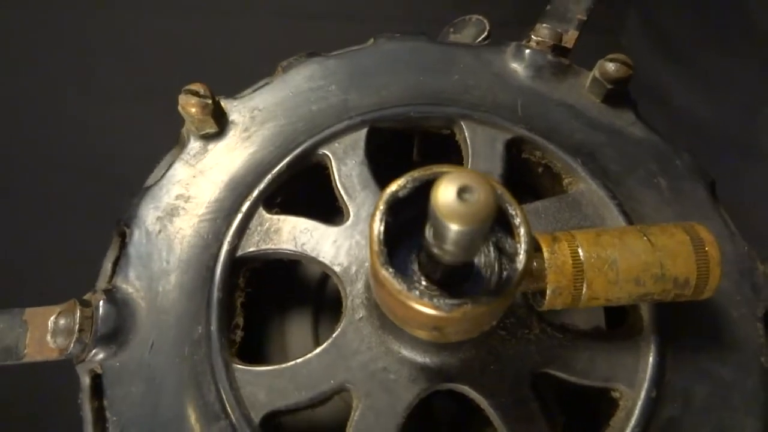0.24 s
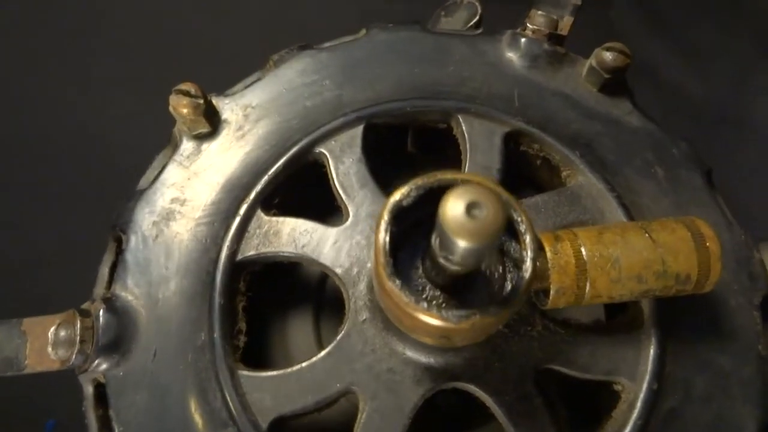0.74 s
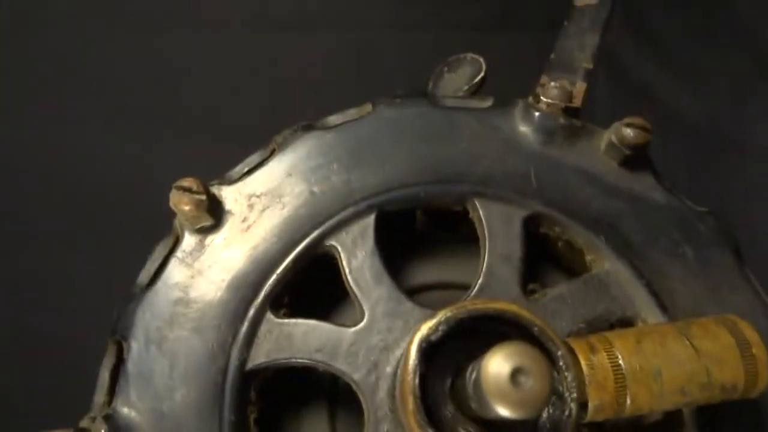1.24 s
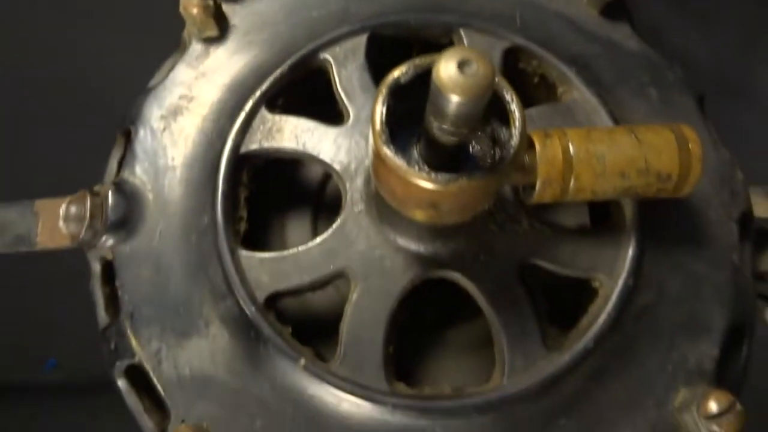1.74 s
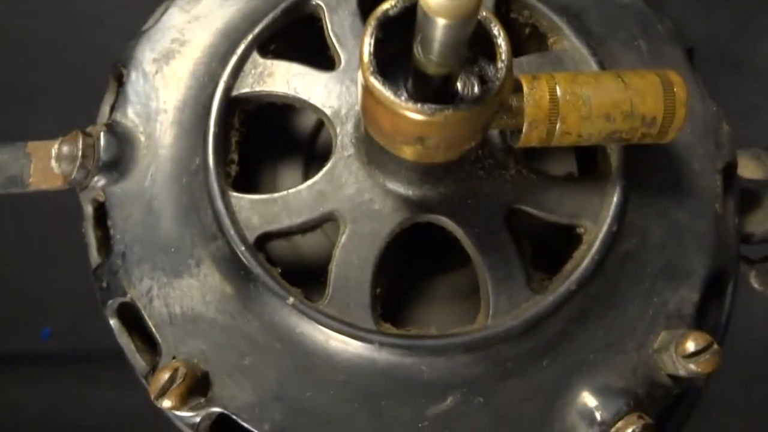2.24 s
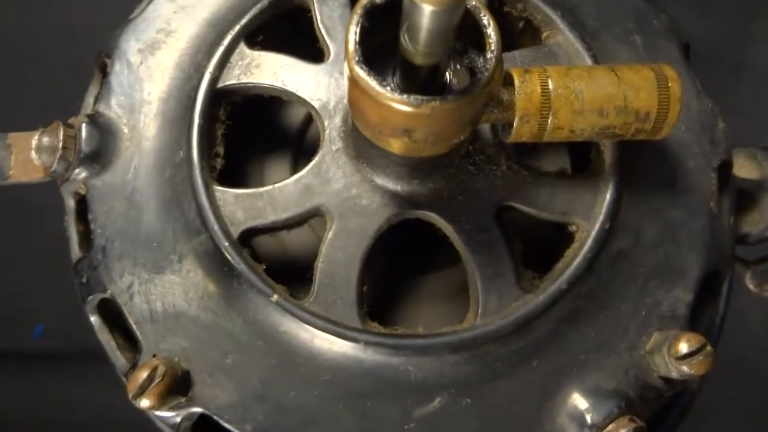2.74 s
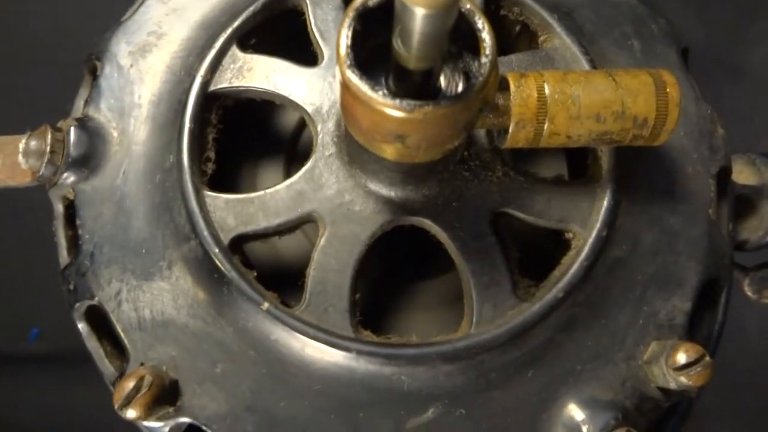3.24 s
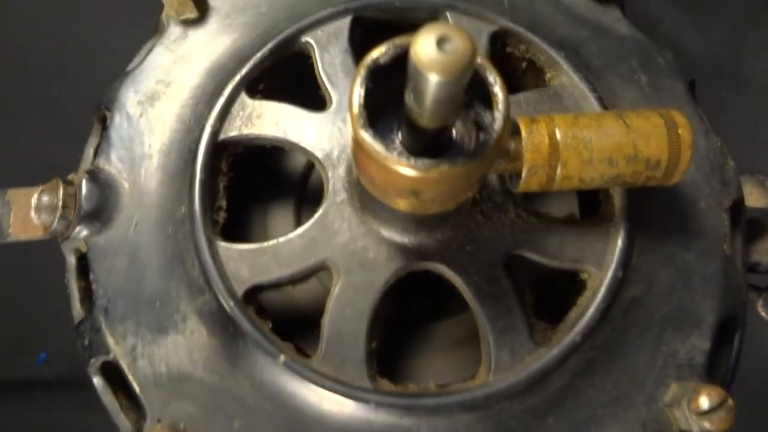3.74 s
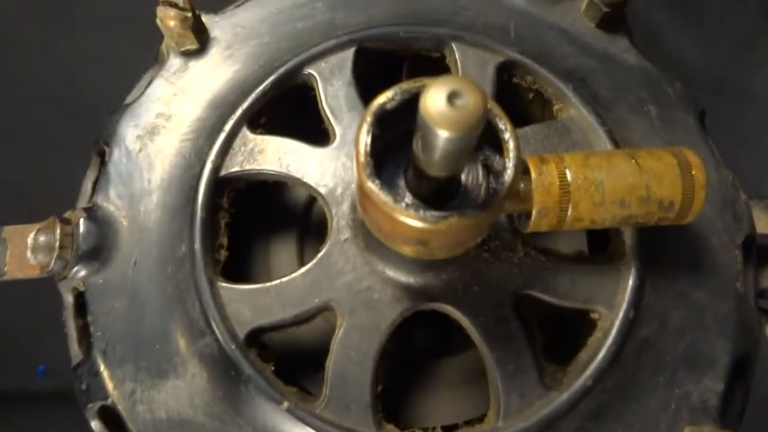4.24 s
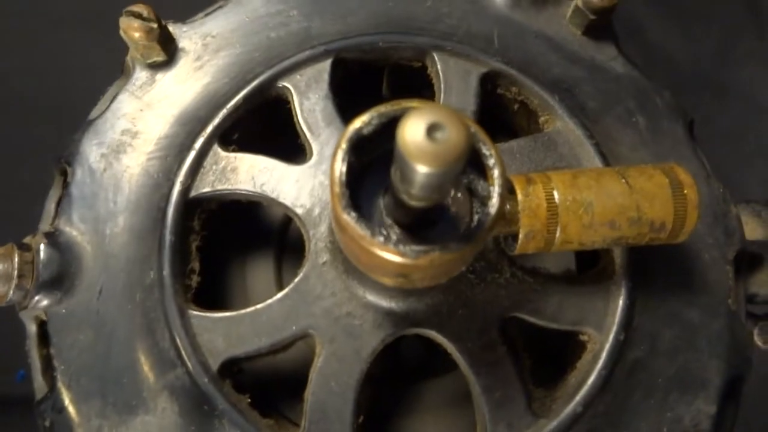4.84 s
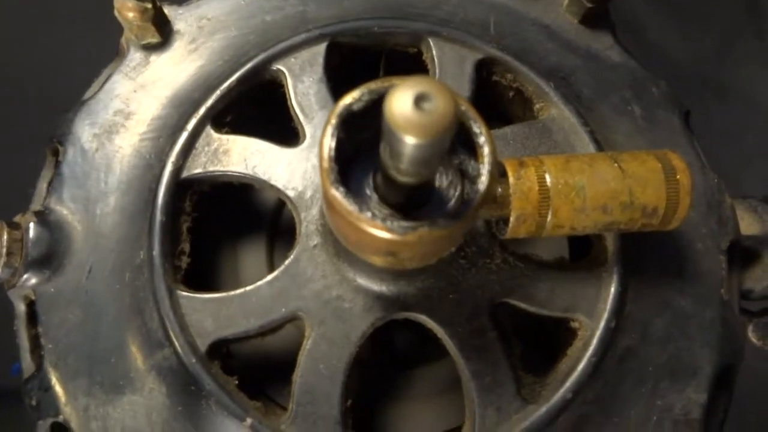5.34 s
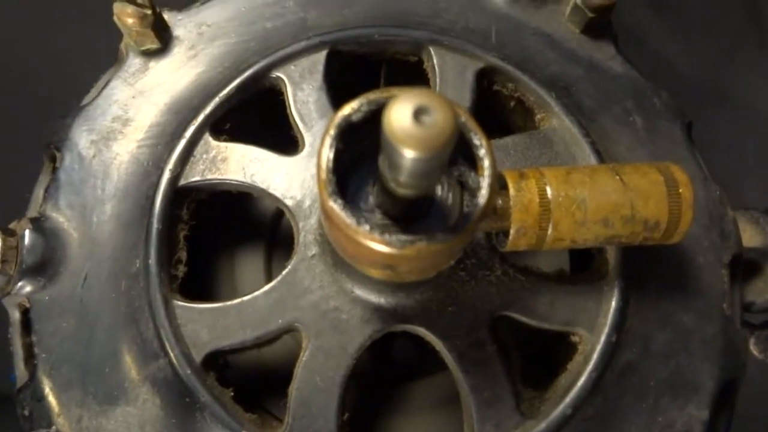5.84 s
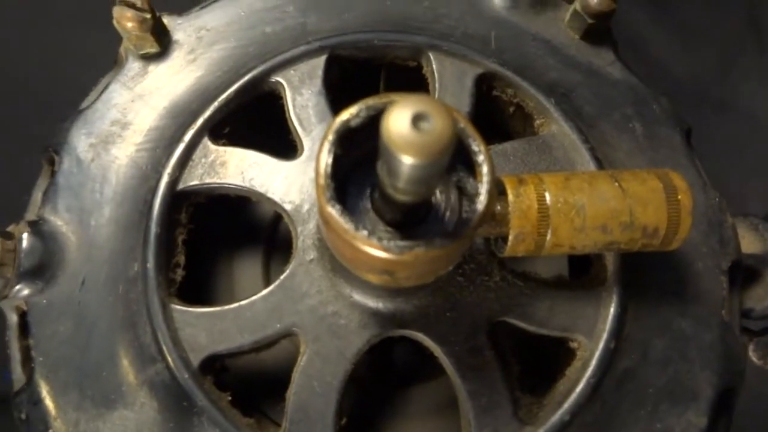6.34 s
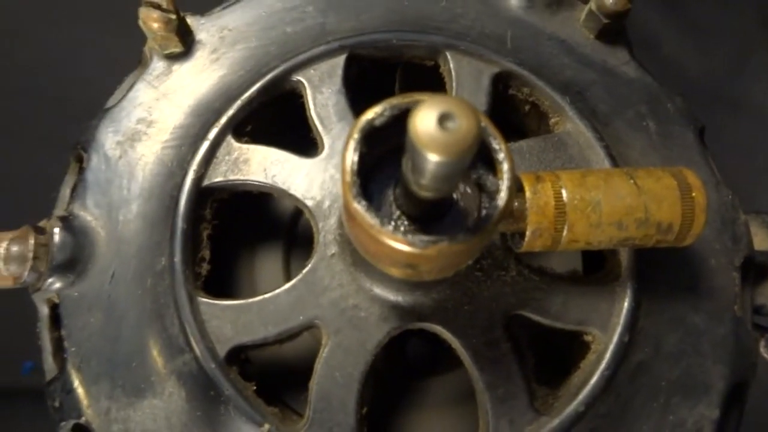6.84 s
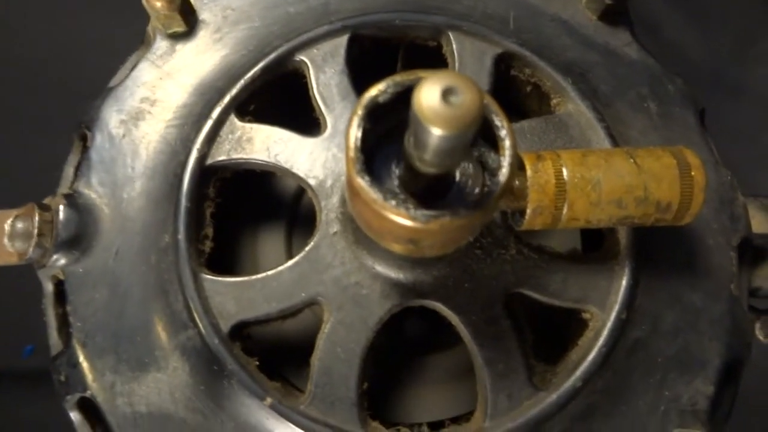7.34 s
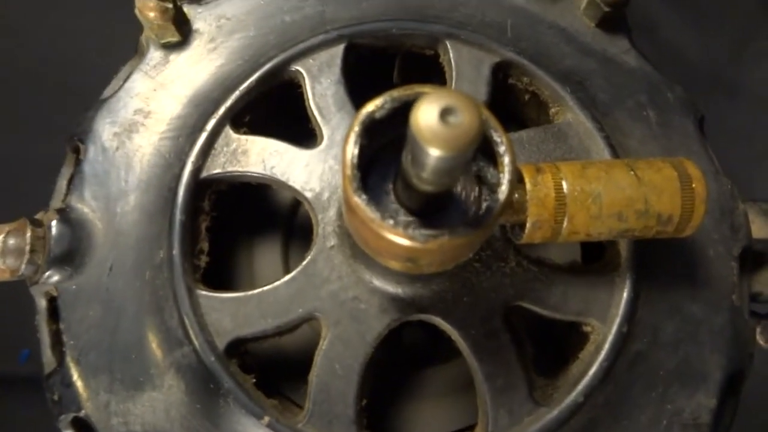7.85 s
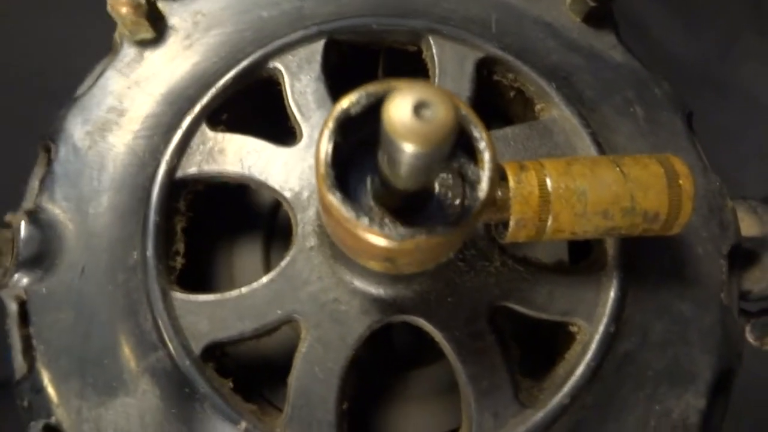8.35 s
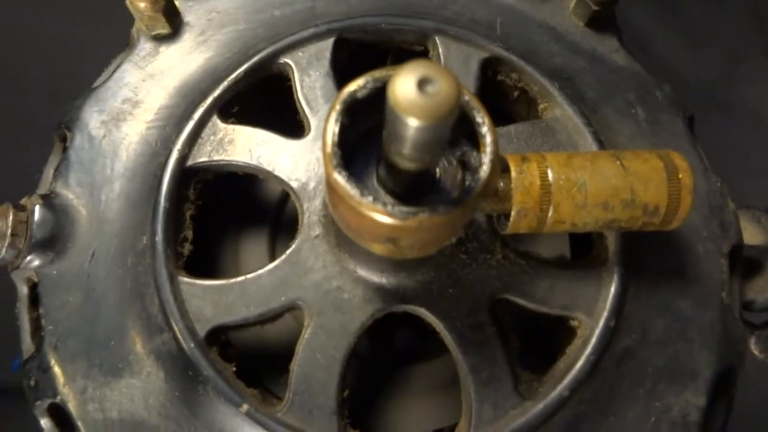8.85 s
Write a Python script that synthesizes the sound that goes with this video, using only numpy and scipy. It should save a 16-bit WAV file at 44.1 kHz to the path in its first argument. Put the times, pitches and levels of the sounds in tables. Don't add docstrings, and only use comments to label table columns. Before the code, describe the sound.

Steady low mains hum and thin whine from a bare fan motor, brief shoe scuff, dry ticks, loud switch clack, then a fluttering, rumbling slowdown.

```python
import sys
import numpy as np
from scipy import signal
from scipy.fft import rfft, irfft, next_fast_len
from scipy.io import wavfile
from scipy.ndimage import uniform_filter1d

SR = 44100
rng = np.random.default_rng(int(sys.argv[2]) if len(sys.argv) > 2 else 0)


def inscribe(sig):
    pcm = np.round(np.clip(np.atleast_2d(sig).T, -1, 1) * 32767)
    wavfile.write(sys.argv[1], SR, pcm.astype(np.int16))


def voltage_ratio(decibels):
    exponent = np.asarray(decibels, float) / 20
    return 10 ** exponent


N = 401745
T = np.arange(N) / SR
OFF_S, DRAG_PER_S = 7.975, .203
MAINS_HZ, SHAFT_HZ, WARMING_HZ_PER_S = 59.98, 27.859, .004
BARS = 37
# pitch_hz, level_db (per Hz)
LAMINATION_COLOUR = [(40, -3), (100, 2.5), (250, -2), (450, -1.5), (680, -11.5), (800, -7), (1000, -10),
                     (1500, -23.5), (2100, -20), (2700, -27), (3200, -19), (4100, -28.5), (4500, -48),
                     (9000, -54)]


def level(x, db):
    return x * voltage_ratio(db) / np.sqrt(np.mean(x ** 2))


def walk(rate):
    points = rng.standard_normal(int(N / SR * rate) + 2)
    k = (T * rate).astype(int)
    blend = .5 - .5 * np.cos(np.pi * (T * rate - k))
    return 0.81 * (points[k] + blend * (points[k + 1] - points[k]))


def noise(colour, side_db):
    hz, db = np.transpose(colour)
    n = next_fast_len(N)
    bin_hz = np.arange(n // 2 + 1) * SR / n
    gain = voltage_ratio(np.interp(np.log(bin_hz + 1), np.log(hz), db, left=-60, right=-90))
    mid, side = (level(irfft(rfft(rng.standard_normal(n)) * gain, n)[:N], 0) for _ in range(2))
    return mid + voltage_ratio(side_db) * side * np.array([[1], [-1]])


def ring(x, hz, t60):
    pole = np.exp(2j * np.pi * min(hz, .45 * SR) / SR - np.log(1000) / (t60 * SR))
    return signal.lfilter([1], [1, -pole], x, axis=-1).imag


def hits(times, db):
    x = np.zeros(N)
    np.add.at(x, (np.atleast_1d(times) * SR).astype(int), voltage_ratio(db))
    return x


def tone(phase, hz, db, flutter_db):
    # pitch_hz, difference_db, phase_rad
    ports = [(130, -26.5, 1.7), (268, -7, 2.1), (500, -9.5, 1.93), (1100, -15.5, 3), (2010, -12, 1.2),
             (4020, -46, 6.6)]
    at, side_db, lag = np.transpose(ports)
    side = voltage_ratio(np.interp(hz, at, side_db)) * np.exp(1j * np.interp(hz, at, lag))
    start = 2 * np.pi * rng.random()
    z = np.sqrt(2) * voltage_ratio(db + flutter_db * walk(5.5)) * np.exp(1j * (phase + start))
    return np.array([(z * (1 + side)).imag, (z * (1 - side)).imag])


def resonate(x, modes):
    out = 0
    for k, (hz, width, db) in enumerate(modes):
        t60 = np.log(1000) / (np.pi * width)
        out = out + (-1) ** k * voltage_ratio(db) * width * ring(x, hz, t60)
    return level(out, 0)


def coasting(held_db, freed_db, fade_db_per_s):
    freed_s = 0.063
    after = np.maximum(T - OFF_S, 0)
    return held_db + (freed_db - held_db) * np.minimum(after / freed_s, 1) - fade_db_per_s * after


def magnetism(mains, shaft, power):
    # time_s, height (0 aside of the motor, 1 above it)
    hand = [
        (.5, 0.027),
        (1.2, 0.84),
        (1.7, 0),
        (2.5, 0),
        (3.9, 0),
        (4.3, 0.41),
        (4.8, 0.89),
        (8, 0.91),
    ]
    # mains_multiple, shaft_multiple, aside_db, above_db
    hum = [(2, -1, -37, -37), (2, 0, -23, -23), (2, 1, -48, -47), (2, 2, -47, -47), (2, 3, -57, -55),
           (4, -1, -62, -58), (4, 0, -50, -51), (4, 1, -46, -46), (4, 2, -60, -61)]
    # mains_multiple, bar_pass_multiple, aside_db, above_db, throb_depth (once a turn)
    whine = [(-2, 1, -58, -58, 0), (0, 1, -67, -56, 1), (2, 1, -44, -44, .11), (4, 1, -65, -67, 0),
             (0, 2, -47, -54, .27), (2, 2, -61, -64, 0), (-2, 3, -61, -62, .3), (0, 3, -63, -64, 1.2),
             (2, 3, -62, -70, .4), (4, 3, -75, -71, 0), (6, 3, -68, -66, .4), (-2, 4, -69, -65, .7),
             (0, 4, -67, -65, .8)]
    wobble_orders = (1, 2, 3, 4, 5, 7, 9, 11, 12, 15, 18, 19)
    wobble_db = (-62.5, -56, -48.5, -41.5, -50.5, -58.5, -67, -54, -69, -54, -62, -52.5)

    above = np.clip(np.interp(T, *np.transpose(hand)), -.5, 1.5)
    lines = [(*row, 0) for row in hum]
    lines += [(a, k * BARS, *rest) for a, k, *rest in whine]
    out = 0
    for a, b, aside_db, above_db, throb in lines:
        db = aside_db + above * (above_db - aside_db)
        flutter_db = -.03 * (aside_db + 10)
        line = tone(a * mains + b * shaft, a * MAINS_HZ + b * SHAFT_HZ, db, flutter_db)
        out = out + line * (1 + throb * np.sin(shaft + 2 * np.pi * rng.random()))
    for b, db in zip(wobble_orders, wobble_db):
        out = out + tone(b * shaft, b * SHAFT_HZ, db, flutter_db=-0.05)

    gate = 1 + 0.37 * np.sin(2 * mains)
    buzz = voltage_ratio(-49.5 + 1.0 * walk(5.5)) * gate * noise(LAMINATION_COLOUR, side_db=-0.5)
    clatter_gate = 1 + 0.94 * np.sin(2 * mains)
    return power * (out + buzz + clatter_gate * clatter(shaft))


def clatter(shaft):
    hz, db = np.transpose(LAMINATION_COLOUR)
    orders = np.arange(1, 170)
    order_db = np.interp(np.log(orders * SHAFT_HZ), np.log(hz), db)
    size = voltage_ratio(order_db + 4.0 * rng.standard_normal(len(orders))) * (orders > 60)
    phases = np.exp(2j * np.pi * rng.random(len(orders)))
    pattern = irfft(np.r_[0, size * phases], 4096)
    turn = shaft / (2 * np.pi) % 1
    return level(np.interp(turn, np.arange(4096) / 4096, pattern, period=1), -56.5)


def rotor(shaft):
    # pitch_hz, width_hz, level_db
    bench = [(103.9, 9.1, 8.5), (124, 9.2, 1.5), (79, 9.8, -20)]
    # pitch_hz, width_hz, level_db
    frame = [(57, 27, -13), (188.6, 9.7, 4), (218, 14, -0.5), (245, 28, -2.5), (295, 12.4, 5),
             (350.3, 5.3, 4), (362, 24, -4), (432.3, 10, 5.5), (780, 180, -25.5)]
    # time_s, extra_db, half_width_s
    shakes = [
        (8.33, 5.5, 0.078),
        (8.6, 9, 0.095),
        (8.87, 4, .04),
        (9.02, 2, .05),
    ]
    # held_db, freed_db, fade_db_per_s
    whistle_levels = (-70, -61.5, 4.5)

    shake_db = sum(db * np.exp(-((T - s) / half) ** 2) for s, db, half in shakes)
    bench_db = coasting(held_db=-69, freed_db=-38.5, fade_db_per_s=9) + shake_db
    frame_db = coasting(held_db=-63, freed_db=-46, fade_db_per_s=3)
    whistle_db = coasting(*whistle_levels)
    turns = np.flatnonzero(np.diff(np.floor(shaft / (2 * np.pi))))
    knocks = hits(turns / SR, .8 * rng.standard_normal(len(turns)))
    whistle = tone(2 * BARS * shaft, 1800, whistle_db + 2.5 * walk(18), flutter_db=2) * (T > OFF_S)
    return voltage_ratio(bench_db) * resonate(knocks, bench) + voltage_ratio(frame_db) * resonate(knocks, frame) + whistle


def switch():
    # time_s, level_db
    snaps_table = [
        (7.9753, -17.5),
        (7.9767, -20.5),
        (7.979, -16.5),
        (7.989, -27.5),
        (8.015, -22),
        (8.035, -44),
        (8.059, -53),
    ]
    # pitch_hz, level_db
    snap_colour = [(150, -27), (250, -2.5), (443, -3.5), (2250, -7.5), (2460, -7), (3080, -11.5),
                   (4430, -9), (5090, -11.5), (6480, -10.5), (13000, -18.5), (15700, -22)]
    # pitch_hz, level_db, t60_s
    metal_modes = [(442, -5.5, 0.097), (625, -5, 0.12), (1613, -2, 0.064), (2570, -7, 0.087),
                   (4260, -11, 0.065), (4395, -4, 0.063), (4530, -4.5, 0.067), (6480, -4, 0.081),
                   (6670, -10, .07), (7680, -2, 0.034), (8250, -16, 0.11), (10000, -12, 0.062),
                   (11900, -9, .06), (13100, -4, .04)]
    # start_s, pitch_hz, level_db, t60_s
    spring_mode = (8.046, 6412, -42.5, 0.63)
    # pitch_hz, level_db, t60_s
    thump_modes = [(114.1, -15.5, 0.49), (94, -18, 0.35)]
    thump_s, thump_rise_s, room_t60_s = 7.994, 0.014, 0.37

    s, db = np.transpose(snaps_table)
    snaps = hits(s, db)
    crack = signal.lfilter([1], [1, -np.exp(-1 / (0.00093 * SR))], snaps)
    tail = signal.lfilter([1], [1, -np.exp(-np.log(1000) / (room_t60_s * SR))], snaps)
    body = (crack + voltage_ratio(-17.5) * tail) * noise(snap_colour, side_db=-11.0)
    rattle = (crack + voltage_ratio(-7.5) * tail) * rng.standard_normal(N)
    metal = sum(voltage_ratio(mode_db - 36.5) * ring(rattle, hz, t60) for hz, mode_db, t60 in metal_modes)

    rise = 1 - np.exp(-np.maximum(T - thump_s, 0) / thump_rise_s)
    thump = 0
    for k, (hz, mode_db, t60) in enumerate(thump_modes):
        thump = thump + (-1) ** k * rise * ring(hits(thump_s, mode_db), hz, t60)
    start_s, spring_hz, spring_db, spring_t60 = spring_mode
    spring = sum(ring(hits(start_s, spring_db - 4 * k), spring_hz + k * 5.3, spring_t60) for k in (0, 1))
    lever = ring(hits(s[0], -15.0), 4490, .04) + ring(hits(s[1], -21.5), 7680, 0.028)
    return body + metal + lever + thump + spring


def bearing(shaft):
    # start_s, level_db
    rub_steps = [
        (0, -62),
        (2.2, -64.5),
        (3.93, -55),
        (4.43, -60),
        (4.8, -55),
        (7.22, -60),
        (8.5, -58.5),
    ]
    # pitch_hz, level_db (per Hz)
    rub_colour = [(3000, -12), (4500, 3.5), (6500, 5), (10000, 3), (14000, 0), (15800, -11)]
    # pitch_hz, t60_s, level_db
    sleeve_mode = (3450, 0.0039, -58.5)
    # time_s, peak_db
    tap_table = [(0.0144, -32), (0.05, -37), (0.0854, -37), (0.1578, -30.5), (0.192, -34), (0.2319, -35),
                 (0.4454, -39), (0.5194, -38), (4.1007, -31.5), (4.169, -30), (4.2053, -23.5),
                 (4.3485, -31.5), (4.396, -34), (4.5755, -38), (4.682, -38), (4.7485, -26.5), (8.233, -38),
                 (8.2806, -42), (8.678, -38), (8.8877, -39), (8.9336, -39), (9.0224, -38)]
    # time_s, peak_db, pitch_hz
    grit_table = [(0.1351, -41, 13500), (0.1595, -36, 12200), (0.1925, -40, 13400), (0.2618, -41, 13100),
                  (1.4162, -34, 14400), (1.5265, -45, 12900), (1.5634, -32, 13200), (2.2473, -40, 12400),
                  (2.6394, -42, 10900), (2.9313, -40, 12400), (2.9762, -35, 11400), (4.054, -39, 11100),
                  (4.6853, -43, 13300), (5.021, -43, 10300), (5.0584, -34, 10600), (5.8591, -40, 12000),
                  (5.9914, -38, 10200)]

    s, db = np.transpose(rub_steps)
    rub_db = uniform_filter1d(db[np.searchsorted(s[1:], T)], int(.1 * SR))
    lean = 1 + 0.092 * np.sin(shaft)
    rub = voltage_ratio(rub_db + 1.1 * walk(13)) * lean * noise(rub_colour, side_db=-22)
    grains = rng.standard_normal(N) * voltage_ratio(3.4 * rng.exponential(size=N)) * lean
    sleeve_hz, sleeve_t60, sleeve_db = sleeve_mode
    sleeve = level(ring(grains, sleeve_hz, sleeve_t60), sleeve_db) * voltage_ratio(1.6 * walk(14))

    tap_hz = 3500 + 170 * rng.standard_normal(len(tap_table))
    taps = 0
    for (s, db), hz in zip(tap_table, tap_hz):
        taps = taps + ring(hits(s, 1.3 * db + 13), hz, .005) + ring(hits(s, 1.3 * db + 5), 1.4 * hz, .003)
    taps = signal.sosfilt(signal.butter(2, (2400, 7500), "band", fs=SR, output="sos"), taps)

    count = 45
    when = OFF_S * rng.random(count)
    size, pitch = rng.standard_normal((count, 2)).T
    fine = zip(when, -44.5 + 1.5 * size, 11900 + 1500 * pitch)
    ticks = sum(ring(hits(s, db + 8.5), hz, 0.0015) for s, db, hz in [*grit_table, *fine])
    return rub + sleeve + taps + ticks * voltage_ratio(np.array([[-4.0], [3.0]]))


def scuff():
    # start_s, peak_db, fall_db_per_s
    drags = [
        (.42, -38, 402),
        (0.886, -23, 108),
    ]
    # pitch_hz, level_db
    body_colour = [(300, -3), (450, -2.5), (900, -4), (1500, -5.5), (2300, -3), (4000, -7.5), (7000, -14),
                   (12000, -41)]
    # pitch_hz, level_db
    edge_colour = [(4000, -29), (7000, -5), (12000, -7), (15800, -17)]
    rise_s, edge_db, edge_fall = 0.024, -5, 1.7

    body, edge = 0, 0
    for s, db, fall_db in drags:
        after = np.maximum(T - s, 0)
        rise = (1 - np.exp(-after / rise_s)) ** 1.27
        body = body + rise * voltage_ratio(db - fall_db * after)
        edge = edge + rise * voltage_ratio(db + edge_db - edge_fall * fall_db * after)
    grit = voltage_ratio(1.1 * walk(300))
    return grit * (body * noise(body_colour, side_db=-17.5) + edge * noise(edge_colour, side_db=-18))


def room_air():
    # pitch_hz, level_db (per Hz)
    air_colour = [(25, -21), (39, -15), (58, -5), (110, -9.5), (300, -9.5), (500, -11.5), (1000, -18.5),
                  (1400, -24.5), (2600, -24.5), (4200, -35.5), (5000, -28.5), (6200, -37.5), (8000, -30),
                  (13000, -33), (15700, -36)]
    return voltage_ratio(-47.5 + 1.3 * walk(3.26)) * noise(air_colour, side_db=-13.5)


def scene():
    after = np.maximum(T - OFF_S, 0)
    speed_hz = (SHAFT_HZ + WARMING_HZ_PER_S * T) * np.exp(-DRAG_PER_S * after)
    shaft = 2 * np.pi * np.cumsum(speed_hz) / SR
    mains = 2 * np.pi * MAINS_HZ * T
    power = np.exp(-after / 0.011)
    air = room_air()
    return magnetism(mains, shaft, power) + rotor(shaft) + bearing(shaft) + switch() + scuff() + air


def roll_off(x):
    return signal.sosfilt(signal.butter(12, 15830, fs=SR, output="sos"), x)


def record(dry):
    mid, side = (dry[0] + dry[1]) / 2, (dry[0] - dry[1]) / 2
    side = signal.lfilter(*signal.butter(1, 9000, fs=SR), side)
    return roll_off(np.array([mid + side, mid - side]))


dry = scene()
out = record(dry)
inscribe(out)
```